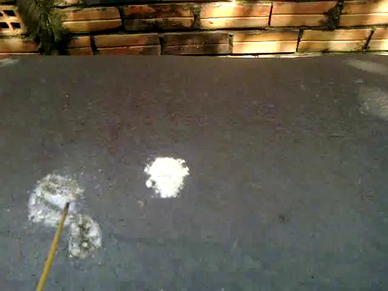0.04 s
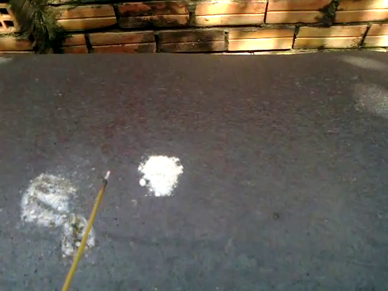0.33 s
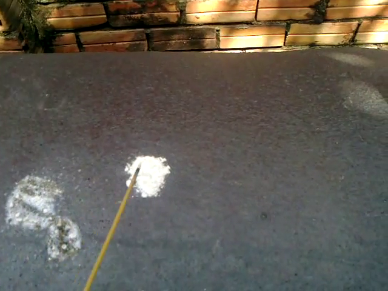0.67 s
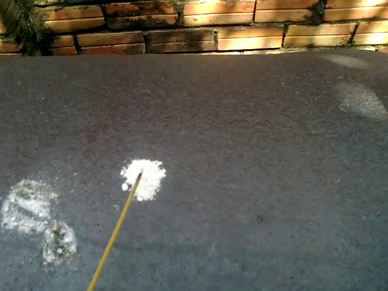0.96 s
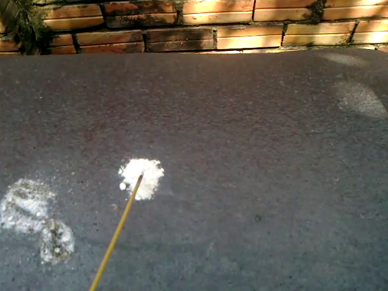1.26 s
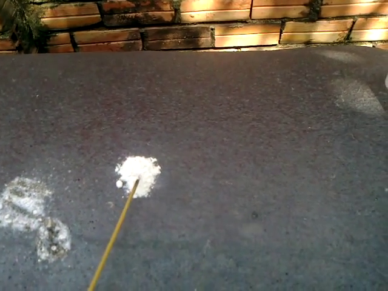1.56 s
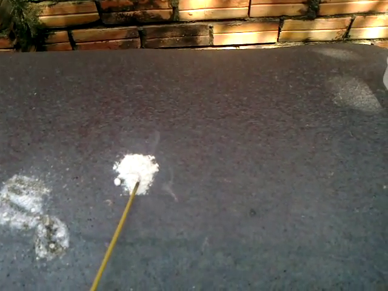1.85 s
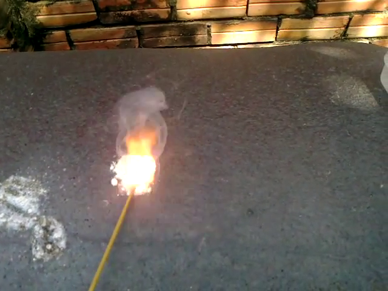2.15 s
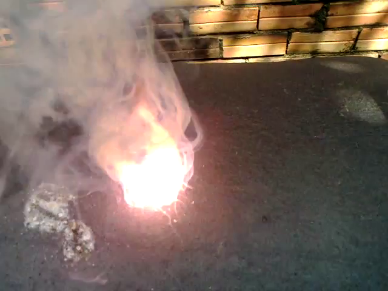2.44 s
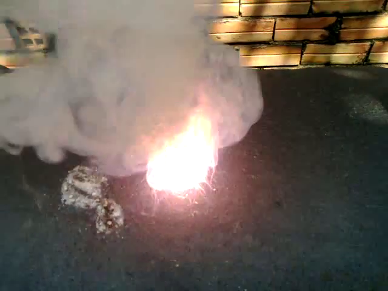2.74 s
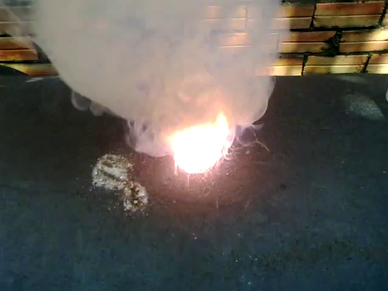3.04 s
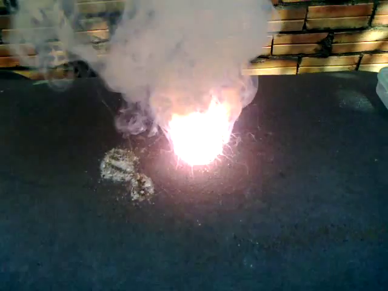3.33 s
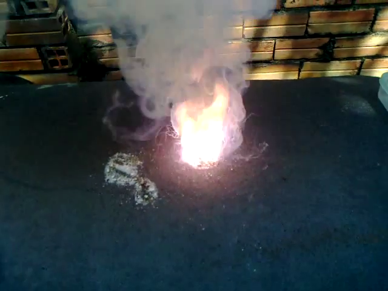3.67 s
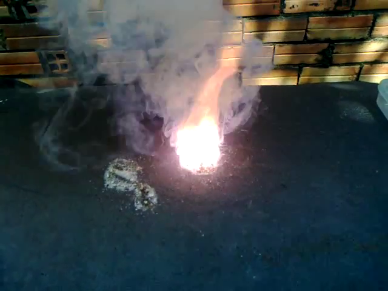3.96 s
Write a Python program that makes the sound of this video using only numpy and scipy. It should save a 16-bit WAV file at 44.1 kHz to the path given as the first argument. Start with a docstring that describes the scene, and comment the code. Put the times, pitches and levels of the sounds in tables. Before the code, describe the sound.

A pile of powder burns outdoors with a roaring flame. First come faint metallic rings and small fizzes over a low rumble, then the powder catches, flares and keeps up a loud roar with a finely crackling hiss.

```python
"""A small pile of powder burns on the ground before a brick wall, lit with a glowing stick.
First a piece of metal rings faintly in the quiet yard, over a low rumble and a thin electrical whine.
The powder fizzes and spits as the stick heats it, then catches with a low flutter about two seconds in.
It flares up and settles to a steady roar of turbulent gas under a hiss of burning grains and tiny sparks."""
import sys
import numpy as np
from scipy import signal
from scipy.fft import rfft, irfft
from scipy.io import wavfile

SR = 44100
rng = np.random.default_rng(int(sys.argv[2]) if len(sys.argv) > 2 else 0)


def persist_wave(psi):
    """Save psi, clipped to +-1, as 16-bit WAV."""
    counts = np.round(np.clip(psi, -1, 1) * 32767).astype(np.int16)
    wavfile.write(sys.argv[1], SR, np.atleast_2d(counts).T)


N = 176400
T, HZ = np.arange(N) / SR, np.fft.rfftfreq(N, 1 / SR) + 1e-3


def amp(db):
    """Decibels to gain."""
    return 10 ** (np.asarray(db) / 20)


def unit(x):
    """Scales to rms 1."""
    return x / np.sqrt(np.mean(x ** 2) + 1e-20)


def curve(rows, column=1):
    """An envelope drawn through one column of a time table."""
    rows = np.array(rows)
    return np.interp(T, rows[:, 0], rows[:, column])


def spectrum(rows):
    """An EQ curve drawn through (freq_hz, level_db) points."""
    hz, db = np.transpose(rows)
    return amp(np.interp(np.log(HZ), np.log(hz), db))


def bell(x, centre, width):
    """A bell curve of height 1."""
    return np.exp(-.5 * ((x - centre) / width) ** 2)


def shaped(x, gain):
    """Filters x by a gain per frequency."""
    return irfft(rfft(x) * gain, N)


def noise(gain):
    """Noise of rms 1 with the given spectrum."""
    return unit(shaped(rng.standard_normal(N), gain))


def below(hz):
    """Gain of a gentle low-pass."""
    return 1 / (1 + (HZ / hz) ** 4)


def yard():
    """The outdoor bed: low rumble, faint air and a distant hum."""
    # tone of the ambience: freq_hz, level_db
    bed_eq = [(12, -36), (20, -4), (43, -0.5), (69, -4.5), (109, -6.5), (166, -16), (202, -11.5),
              (458, -26.5), (513, -26.5), (1010, -29.5), (1820, -36), (3490, -38.5), (4630, -44),
              (10800, -47.5), (16900, -51)]
    # its slow swells: time_s, rumble_db, air_offset_db
    swells = [(.23, -46.5, 3), (.6, -44.5, 2.5), (.9, -44, 3), (1.3, -43.5, 0), (1.48, -48, 1.5),
              (1.6, -45.5, 3.5), (1.85, -43, 1.5), (4.0, -44, -11)]
    air_db, crossover_hz = -43.5, 610
    bed = noise(spectrum(bed_eq))
    rumble = shaped(bed, below(crossover_hz))
    air = bed - rumble
    hum = amp(-59) * noise(bell(HZ, centre=197, width=6.5))
    return rumble * amp(curve(swells)) + air * amp(air_db + curve(swells, column=2)) + hum


def whine():
    """A thin electrical whine: two close, steady tones, each in a narrow halo of noise."""
    # the tones: pitch_hz, level_db
    tones = [(10643, -77.5), (10707, -73)]
    return sum(amp(db) * (np.sin(2 * np.pi * hz * T) + .3 * noise(bell(HZ, hz, width=40)))
               for hz, db in tones)


def metal():
    """Light knocks and rubs ring close pairs of modes in the metal, which beat and waver as they die."""
    # the touches: start_s, level_db, tilt_db_per_octave, rise_s
    clinks = [(.229, -57.5, 10.5, 0.0025), (.262, -50.5, -1, 0.011), (.34, -54, -11, 0.01),
              (.405, -60, -35, 0.012), (.535, -53, -3, .004), (.845, -65, 2, .015), (.99, -69, -14, 0.027),
              (1.15, -71, 6, .03), (1.42, -70, 2, .025), (1.465, -62.5, -6, .012), (1.745, -64, -12, .025),
              (1.97, -68.5, -8, 0.028)]
    # modes of the metal: pitch_hz, gain_db, t60_s, beat_hz
    modes = [(3560, -4.5, 0.85, 6.5), (3953, -0.5, 0.68, 15), (6200, -18, .5, 9), (6414, -3, 0.42, 5.1),
             (7450, -14, .4, 11), (8145, -18, 0.38, 18), (9500, -21, 0.36, 13), (11569, -27, .3, 8)]
    pivot_hz = 3900
    out = np.zeros(N)
    for hz, mode_db, t60, beat_hz in modes:
        energy = np.zeros(N)
        for start, knock_db, tilt, rise in clinks:
            attack = np.clip((T - start) / rise, 0, 1)
            decay_db = 60 * np.maximum(T - start, 0) / t60
            energy += (attack * amp(knock_db + tilt * np.log2(hz / pivot_hz) - decay_db)) ** 2
        tone = np.sin(2 * np.pi * hz * T)
        twin = .35 * np.sin(2 * np.pi * ((hz + beat_hz) * T + rng.random()))
        waver = noise(bell(HZ, hz, width=30.2))
        out += amp(mode_db) * np.sqrt(energy) * (tone + twin + waver)
    return out


def ignition():
    """The powder fizzes and spits at the glowing tip, and the first flame murmurs as it catches."""
    # resonances of the first flame: centre_hz, width_hz, gain_db
    resonances = [(420, 50, -7.5), (674, 19, 3.5), (990, 42, -7)]
    # swells of its murmur: peak_s, half_length_s, level_db
    catches = [(1.96, 0.012, -53), (2.048, .024, -43), (2.172, 0.027, -43), (2.242, 0.024, -31.5)]
    # fizzes of the heating powder: peak_s, rise_s, fall_s, level_db, centre_hz
    fizzes = [(.805, 0.015, 0.048, -49.5, 3640), (1.432, 0.0091, 0.017, -57.5, 2600),
              (1.57, .016, .015, -51.5, 3900), (1.605, 0.015, 0.039, -50.5, 3350),
              (1.682, 0.0087, .007, -48.5, 3870), (1.701, .005, 0.011, -54, 2750),
              (2.218, .02, 0.023, -47, 5170), (2.215, 0.023, 0.014, -52, 8000)]
    # single grains spitting: start_s, level_db, fall_s, centre_hz
    spits = [(0.374, -50, .012, 1100), (.541, -56, .03, 5000), (0.658, -45.5, 0.011, 1500),
             (.80, -59, .02, 6000), (0.899, -53, 0.013, 2470), (1.437, -60, .01, 7000),
             (1.667, -48, 0.03, 4070), (1.671, -51, 0.023, 700), (2.08, -52, 0.0088, 2520),
             (2.113, -38.5, 0.011, 1780), (2.151, -36, 0.007, 1800)]
    fizz_octaves, spit_octaves, spit_attack_s = .33, .84, .0015
    murmur = noise(sum(amp(db) * bell(HZ, hz, width) for hz, width, db in resonances))
    out = murmur * sum(amp(db) * bell(T, peak, half_length) for peak, half_length, db in catches)
    grit_db = noise(below(250))  # a fast 1 dB tremble roughens the fizzes
    for peak, rise, fall, db, hz in fizzes:
        swell = bell(T, peak, np.where(T < peak, rise, fall))
        out += amp(db + grit_db) * swell * noise(bell(np.log2(HZ / hz), 0, fizz_octaves))
    for start, db, fall, hz in spits:
        age = np.maximum(T - start, 0)
        burst = np.minimum(age / spit_attack_s, 1) * np.exp(-age / fall)
        out += amp(db) * burst * noise(bell(np.log2(HZ / hz), 0, spit_octaves))
    return out


def sparks(per_s):
    """Tiny sparks: randomly timed clicks of nearly equal strength."""
    clicks = (rng.random(N) < per_s / SR) * rng.choice([-1, 1], N)
    return clicks * amp(-.5 * np.minimum(rng.exponential(1, N), 5))


def flame_colour(x):
    """A moving EQ: peaks and hollows glide from flare to steady burn while random patches drift."""
    # peaks and hollows of the flame: flare_hz, steady_hz, width_hz, flare_db, steady_db
    bands = [(362, 320, 62, 2.5, 2), (543, 580, 31, -0.5, -1.5), (650, 638, 41, 5.5, 7),
             (773, 835, 49, -4, -6.5), (955, 900, 39, 1, 3.5), (1380, 1270, 56, 3, 5),
             (1490, 1460, 46, -3, -2), (1900, 1870, 54, -5.5, -4.5), (2050, 2020, 75, 0.5, 3),
             (2130, 2134, 21, -3, -8), (2830, 2675, 28, 6.5, 6), (3000, 2760, 66, -4.5, -4),
             (3470, 3700, 42, -13, -4.5), (3700, 3580, 100, 6.5, 5.5), (4600, 4900, 81, 6, 1),
             (5580, 5500, 150, 6, 2), (6900, 6900, 200, 3, 5.5), (7400, 7300, 110, 3, 1.5),
             (9400, 8700, 280, -3, 1)]
    # depth of the drifting patches, greatest in the treble: freq_hz, depth_db
    patch_depth = [(300, 0.1), (1500, 1.3), (3000, 1.5), (7000, 2.4), (10000, 1.7), (15000, -1)]
    glide_start_s, glide_end_s = 2.33, 2.85
    patch_hz, patch_s = 50.3, .058
    hz, t, frames = signal.stft(x, SR, nperseg=2048, noverlap=1536)
    hz = hz[:, None]
    glide = np.clip((t - glide_start_s) / (glide_end_s - glide_start_s), 0, 1)
    eq_db = sum((db0 + (db1 - db0) * glide) * bell(hz, hz0 + (hz1 - hz0) * glide, width)
                for hz0, hz1, width, db0, db1 in bands)
    patch_shape = bell(hz, hz.mean(), patch_hz) * bell(t, t.mean(), patch_s)
    patches = unit(signal.fftconvolve(rng.standard_normal(frames.shape), patch_shape, "same"))
    drift_db = patches * np.interp(hz, *np.transpose(patch_depth))
    return signal.istft(frames * amp(eq_db + drift_db), SR, nperseg=2048, noverlap=1536)[1][:N]


def flame():
    """Turbulent gas roars and grains hiss and spark; the flame sputters until the whole pile burns."""
    # envelope of the burn, ahead of the shelves and trim: time_s, roar_db, hiss_db
    burn = [(1.96, -59, -76), (2.05, -49.5, -65), (2.10, -45, -58), (2.125, -39, -51), (2.18, -37, -49.5),
            (2.21, -34.5, -46.5), (2.232, -27, -47), (2.32, -26, -46), (2.39, -23, -43.5),
            (2.58, -22.5, -42), (2.74, -24, -44), (2.9, -23, -43), (3.03, -22.5, -46), (3.13, -24, -43.5),
            (3.25, -23, -46), (3.85, -24, -46.5), (4.0, -25, -46)]
    # tone of the turbulent roar: freq_hz, level_db
    roar_eq = [(25, -17), (90, -3), (330, 0), (500, -2), (1200, 1), (1900, -2.5), (2650, -8.5), (3000, -17),
               (3900, -20), (4300, -34), (8000, -56)]
    # tone of the burning grains: freq_hz, level_db
    hiss_eq = [(1500, -16), (4200, -1), (6000, -1), (7500, 0), (9300, -1.5), (11000, -8), (13500, -13),
               (16000, -21), (17000, -30)]
    # low shelf on the roar, growing with the flame: time_s, gain_db
    low_shelf = [(2.1, -2.5), (2.25, -0.5), (2.5, 1), (2.9, 0.5), (4.0, -0.5)]
    # high shelf on the roar, dull at ignition and brightest in the flare: time_s, gain_db
    high_shelf = [(2.03, -10), (2.11, 4.5), (2.25, 3.5), (2.6, 2), (3.0, -3.5), (4.0, 0.5)]
    flutter_db, flutter_hz, sputter_db, settled_s = .06, 24.7, 3, 2.25
    trim_db = .5
    lit = np.clip((T - burn[0][0]) / .04 + 1, 0, 1)
    unrest_db = flutter_db + sputter_db * np.clip((settled_s - T) / .2, 0, 1)
    flutter = amp(unrest_db * noise(below(flutter_hz)))
    roar = unit(flame_colour(noise(spectrum(roar_eq))))
    lows, highs = shaped(roar, below(hz=455)), shaped(roar, 1 - below(hz=1120))
    roar += lows * (amp(curve(low_shelf)) - 1) + highs * (amp(curve(high_shelf)) - 1)
    roar *= flutter * amp(curve(burn))
    crackle = amp(-2) * unit(shaped(sparks(per_s=1500), spectrum(hiss_eq)))
    hiss = unit(flame_colour(noise(spectrum(hiss_eq)) + crackle))
    hiss *= np.sqrt(flutter) * amp(curve(burn, column=2))
    return lit * amp(trim_db) * (roar + hiss)


def scene():
    """The burning powder, the metal and the background in one mono mix."""
    return (flame() + ignition() + metal() + yard() + whine())[None]


def record(dry):
    """The sound cuts in after a short silence; a steep low-pass takes off the very top."""
    start_s, fade_s, cutoff_hz = .231, .0033, 16900
    fade_in = np.clip((T - start_s) / fade_s, 0, 1)
    low_pass = signal.firwin(511, cutoff_hz, window=("kaiser", 9), fs=SR)
    return signal.oaconvolve(dry * fade_in, low_pass[None], "same")


dry = scene()
out = record(dry)
persist_wave(out)
```